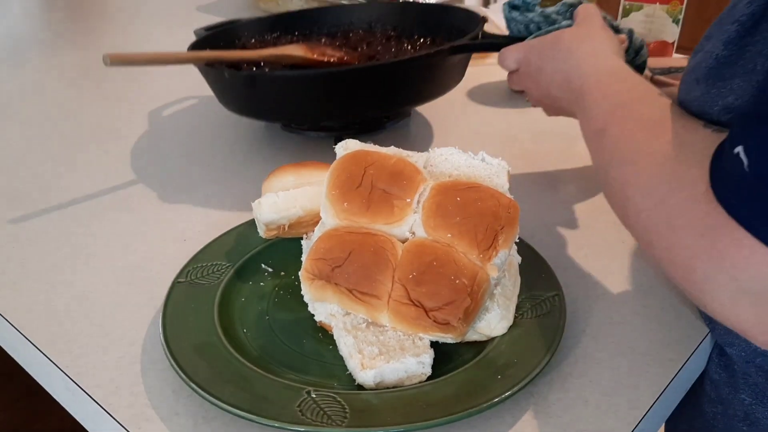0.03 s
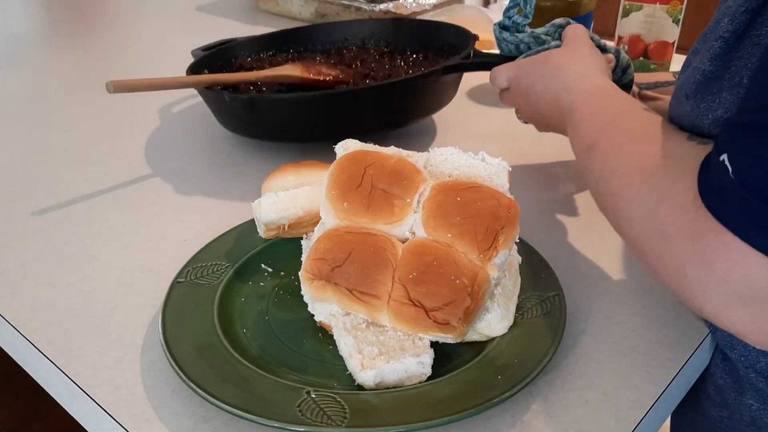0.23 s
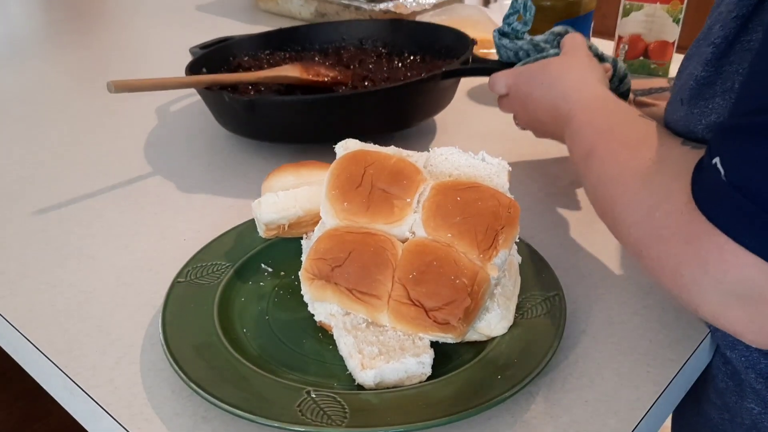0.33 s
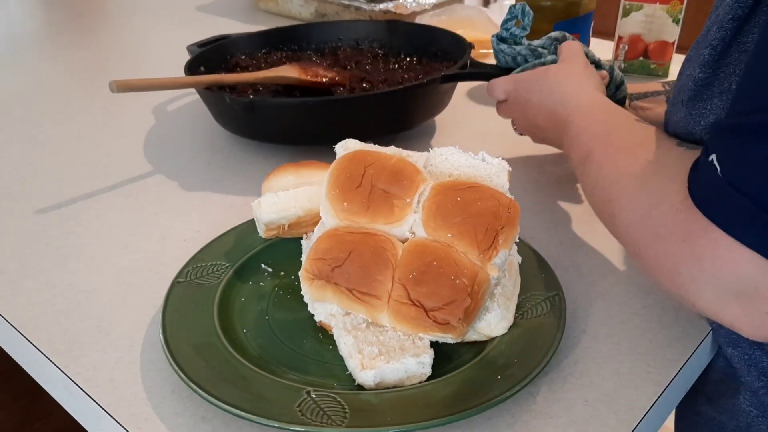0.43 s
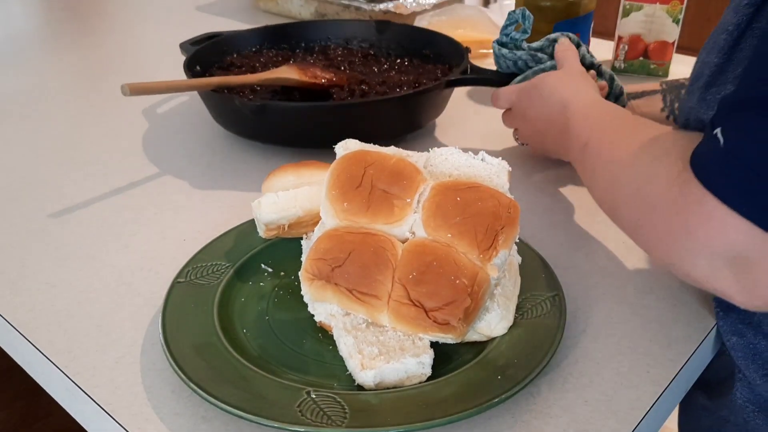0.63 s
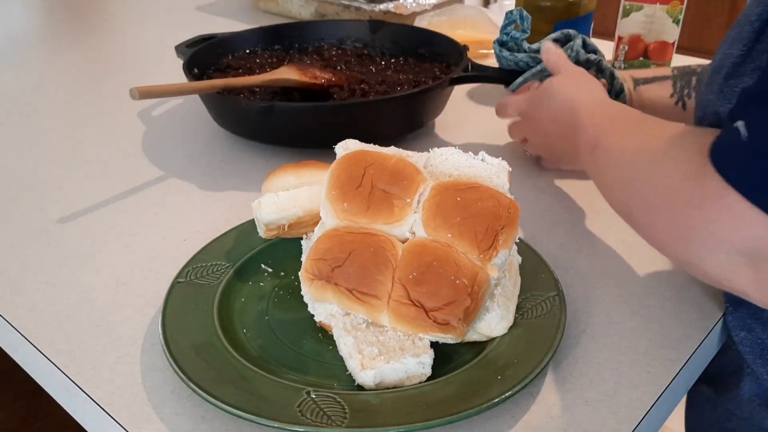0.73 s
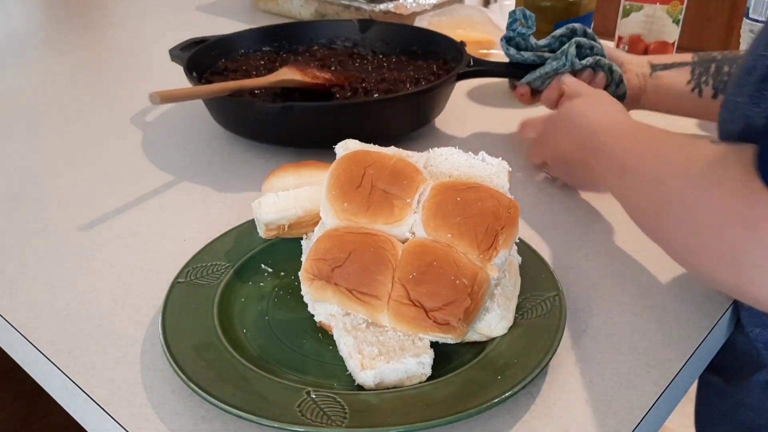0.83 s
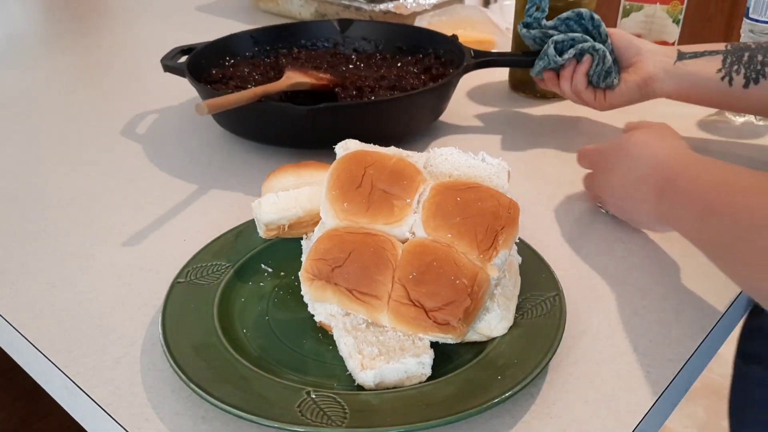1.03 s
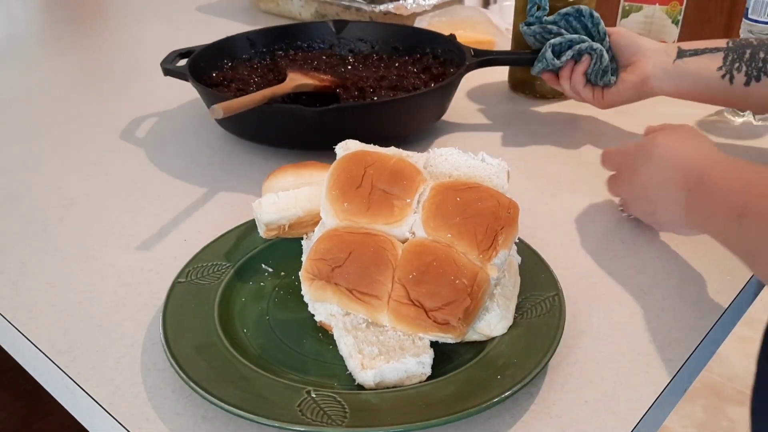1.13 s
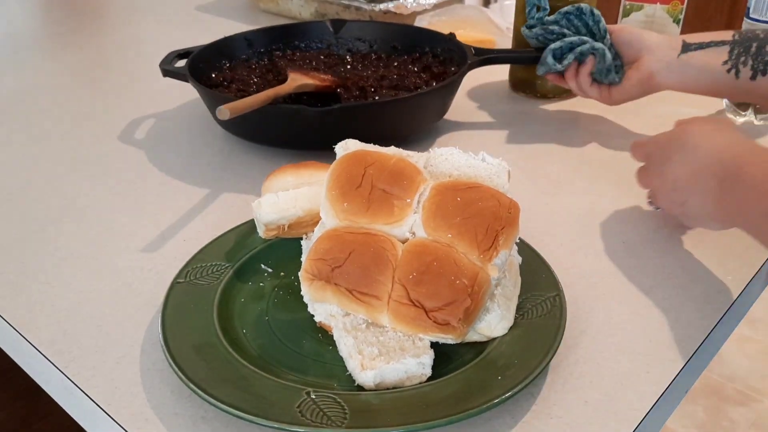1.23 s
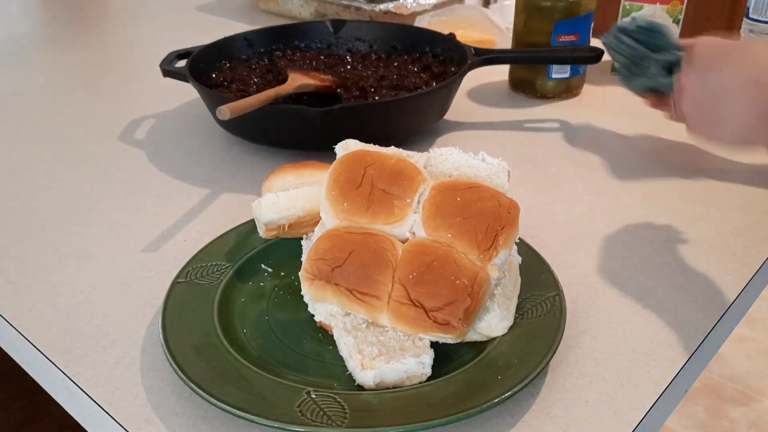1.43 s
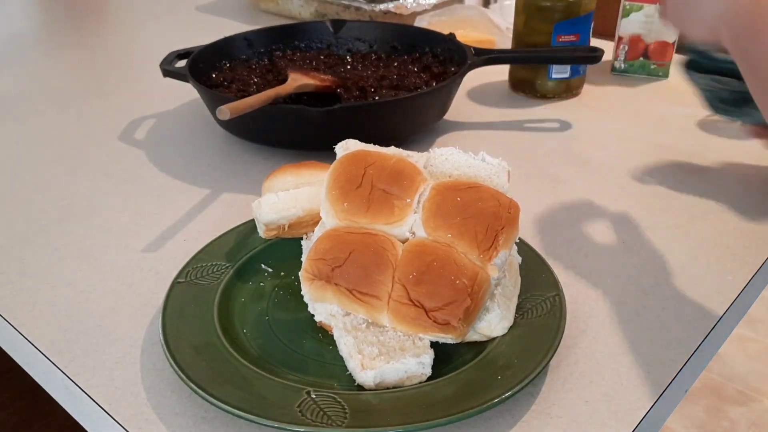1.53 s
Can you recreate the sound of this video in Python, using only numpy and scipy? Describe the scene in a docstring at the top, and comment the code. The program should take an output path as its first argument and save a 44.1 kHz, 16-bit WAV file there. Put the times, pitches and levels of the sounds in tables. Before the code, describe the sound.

Heavy iron pan set down on a worktop with a double clunk, clatter and short gritty shuffle

```python
"""In a small, quiet kitchen, a heavy, full cast-iron skillet lands on the counter: one edge first,
then it rocks and clunks flat. Each contact is a burst of noise plus fading tones for worktop and iron.
Light knocks follow, the pan is shuffled round on its base and the pot cloth slips off the handle.
Grating, rasping and rustling are made of thousands of tiny random clicks, shaped in tone and level.
Fading noise adds the echo of the room; steady noise and a low tone make its air and hum."""
import sys
import numpy as np
from scipy import signal
from scipy.fft import rfft, irfft, next_fast_len
from scipy.io import wavfile

SR = 44100
rng = np.random.default_rng(int(sys.argv[2]) if len(sys.argv) > 2 else 0)


def persist_wave(psi):
    """Save psi, clipped to +-1, as 16-bit WAV."""
    counts = np.round(np.clip(psi, -1, 1) * 32767).astype(np.int16)
    wavfile.write(sys.argv[1], SR, np.atleast_2d(counts).T)


N = 70560  # length in samples: 1.6 seconds

# A "t60" is the time in which a sound fades by 60 dB.

# Still air of the room. Each row: frequency in Hz, relative level in dB.
AIR_COLOUR = [(15, -64.5), (25, -38), (48, 3), (108, -16), (166, -9.5), (206, -27.5), (249, -9.5),
              (489, -7), (560, -22.5), (754, -12.5), (818, -30), (2350, -24.5), (4610, -38), (6740, -37.5),
              (16000, -36.5)]
AIR_DB, HUM_HZ, HUM_DB = -69, 59, -81

# Cloth rubbing on the handle. Each row: time in seconds, level in dB.
CLOTH_LEVEL = [(0, -82), (.7, -70), (.88, -68.5), (1.02, -62), (1.1, -76), (1.21, -75.5), (1.28, -68.5),
               (1.40, -69.5), (1.44, -65.5), (1.49, -74), (1.6, -71.5)]
# Tone of the cloth. Each row: frequency in Hz, relative level in dB.
CLOTH_COLOUR = [(200, -12), (900, -13), (1800, 3), (3500, -2), (5200, 3.5), (6700, 8), (9200, -8),
                (11000, -5), (16000, -7)]

# Contacts of the pan. Each row: start in seconds, noise level in dB, frequency in Hz above which
# the noise gets weaker, worktop thump level in dB, iron ring level in dB.
CONTACTS = [(.221, -25, 2800, -25, -41.5), (0.239, -26, 900, -20.5, -35.5),
            (0.264, -15.5, 1100, -25.5, -30.5), (0.2704, -18, 1700, -16.5, -32),
            (.279, -34, 1000, -36, -24.5), (.290, -18, 1200, -27.5, -31), (.304, -23, 1400, -27.5, -33.5),
            (0.32, -24, 1700, -43, -29), (0.349, -31, 1200, -27, -34), (.386, -28.5, 1100, -31.5, -35),
            (0.49, -34, 6000, -40, -32.5), (0.4949, -13.5, 4300, -22.5, -31), (.502, -19, 1800, -54, -26),
            (.515, -25.5, 2500, -26, -28.5), (0.5504, -14.5, 5500, -33, -25.5),
            (.553, -15.5, 5500, -26, -40), (.577, -22.5, 4000, -57, -34.5),
            (0.601, -19.5, 1500, -35.5, -34), (.613, -15, 2200, -17, -31), (.621, -17, 450, -22.5, -39.5),
            (0.634, -22, 450, -31, -30), (.652, -24, 600, -35, -38), (.668, -53.5, 450, -25.5, -43.5)]
# The bare crack of a contact. Each row: frequency in Hz, relative level in dB.
CRACK_COLOUR = [(100, -18), (400, 12.5), (900, 8), (1500, 10.5), (3000, 3.5), (6000, -15), (8000, -4),
                (9300, -23.5), (11000, -7), (16000, -10)]
CRACK_DB, CRACK_T60_S = 0.5, 0.012
# Dense clatter of pan and counter. Each row: frequency in Hz, relative level in dB.
CLATTER_COLOUR = [(30, -21.5), (80, -8.5), (125, 3), (200, 5.5), (245, 2), (320, 10.5), (480, 12.5),
                  (620, 6), (900, 9), (1200, 0), (1500, 3.5), (2200, -1), (3700, -0.5), (5000, -6),
                  (7500, -12.5), (9200, -14.5), (11000, -1.5), (16000, -8.5)]
# How fast the clatter fades. Each row: frequency in Hz, t60 in seconds.
CLATTER_FADE = [(100, 0.36), (450, 0.16), (1500, 0.066), (4000, 0.041), (12000, 0.012)]
# Tones of the worktop. Each row: frequency in Hz, typical relative level in dB, t60 in seconds.
WORKTOP_TONES = [(122, -7, .08), (163, 1, .085), (208, -5, .1), (276, -10, .14), (302, -3, .11),
                 (422, -7, .12)]
# Tones of the iron. Each row: frequency in Hz, typical relative level in dB,
# t60 in seconds while on one edge, t60 in seconds once the base is down.
IRON_TONES = [(478, -6, 0.44, 0.3), (508.5, -3.5, 0.1, 0.071), (564.3, -14.5, 0.66, 0.13),
              (700.3, -0.5, 0.1, .12), (788.5, -4, 0.047, .16), (915, -5.5, 0.098, 0.17),
              (1043.3, -9, .08, 0.12), (1146, -13.5, .12, .1), (1332, -16.5, 0.12, 0.14),
              (1495, -7, 0.26, 0.051), (1589, -7, 0.28, 0.086), (1720, -21.5, 0.14, .1),
              (2002, -19, 0.12, 0.22), (2490, -28.5, .15, .2), (3344, -43, .08, .22),
              (3716, -31.5, .05, .22), (7900, -38.5, .08, .02)]
BASE_DOWN_S = 0.48
THUMP_ATTACK_S, RING_ATTACK_S = 0.0034, 0.00047
CONTACT_SLOPE = 2.01  # how steeply the noise weakens at high frequencies
SCATTER_DB = 4.5  # random spread of each tone's level
LOW_CUT_HZ = 93

# Iron grating on the counter. Each row: time in seconds, level in dB.
GRATE_LEVEL = [(.225, -64), (.265, -38), (.32, -46.5), (.42, -60.5), (.485, -56.5), (.505, -39), (.59, -35),
               (.65, -48), (.72, -51), (.78, -53.5), (.83, -46.5), (.9, -50.5), (1.02, -57), (1.1, -61.5),
               (1.22, -77), (1.35, -105)]
# Tone of the grating. Each row: frequency in Hz, relative level in dB.
GRATE_COLOUR = [(100, -15.5), (400, 5.5), (900, 4), (1600, -2.5), (2800, -11), (4000, -21), (6000, -13.5),
                (9000, -33.5), (12000, -24.5), (16000, -30)]
# The base juddering over the worktop. Each row: time in seconds, level in dB.
JUDDER_LEVEL = [(.68, -73), (.72, -63), (.78, -78), (.83, -61), (.89, -47.5), (.95, -40), (1.02, -41.5),
                (1.09, -53.5), (1.19, -55.5), (1.26, -76), (1.35, -85)]
# Tone of the juddering. Each row: frequency in Hz, relative level in dB.
JUDDER_COLOUR = [(25, -28), (55, -9), (100, -11), (135, -2.5), (172, 5), (228, -9.5), (290, 2.5),
                 (380, -12.5), (550, -12), (900, -22.5), (2000, -36), (6000, -67.5)]
GRATE_SLIPS_PER_S, JUDDER_SLIPS_PER_S = 2300, 1200

# The tilted edge rasping along the counter. Each row: time in seconds, level in dB.
RASP_LEVEL = [(.258, -50.5), (.272, -29.5), (.325, -28.5), (.36, -42), (.395, -42.5), (.47, -81.5)]
# Tones of the iron wall. Each row: centre in Hz, half-width in Hz, relative level in dB.
WALL_PEAKS = [(697, 160, 1.5), (940, 150, -0.5), (1430, 280, 1.5), (1680, 53, -12.5), (2400, 270, -9.5),
              (7000, 1500, -33)]
RASP_SLIPS_PER_S = 900

# Light knocks. Each row: start in seconds, noise level in dB, pitch in Hz, typical tone level in dB.
LIGHT_KNOCKS = [(.787, -31.5, 808, -43), (.812, -38, 527, -38.5), (.824, -47, 502, -35.5)]
# Tone of the knock noise. Each row: frequency in Hz, relative level in dB.
KNOCK_NOISE_COLOUR = [(100, -49), (500, -30), (800, 11), (1500, 8), (3000, -1.5), (6000, -11.5),
                      (9000, -22.5), (11000, -10.5), (16000, -20)]
KNOCK_T60_S, TONE_T60_S = 0.046, 0.13

# How alike left and right are. Each row: frequency in Hz, likeness from 0 (unrelated) to 1 (same).
LIKENESS = [(60, 0.72), (160, 1), (280, 0.85), (500, 0.85), (1000, 0.4), (2000, 0), (12000, 0)]
# Left-right balance of the pan. Each row: frequency in Hz, left minus right in dB.
PAN_BALANCE = [(100, 0.5), (250, 1.5), (500, 2.5), (1000, 1.5), (2000, 1.75), (4000, -0.5), (8000, -7.5),
               (12000, 6.2)]
# How fast the room echo fades. Each row: frequency in Hz, t60 in seconds.
ROOM_FADE = [(100, 0.45), (220, .2), (450, 0.34), (2000, 0.34), (6000, .44), (14000, 0.26)]
# Tone of the room echo. Each row: frequency in Hz, level in dB compared with the direct sound.
ECHO_COLOUR = [(140, -11), (400, -10.5), (1500, -7.5), (4000, -2.5), (12000, -7)]
ROOM_BUILD_S = 0.0024
TOP_HZ = 16100


def amp(db):
    """Turn decibels into a plain multiplier."""
    return 10 ** (np.asarray(db) / 20)


def unit(x):
    """Scale a sound to an average strength (rms) of 1."""
    return x / np.sqrt(np.mean(x ** 2) + 1e-20)


def along(points, hz):
    """Read a value between table rows, with frequency on a log scale."""
    point_hz, values = np.transpose(points)
    return np.interp(np.log(hz + 1), np.log(point_hz + 1), values)


def level(rows):
    """Turn rows of seconds and dB into a multiplier for every sample."""
    times, levels_db = np.transpose(rows)
    return amp(np.interp(np.arange(N) / SR, times, levels_db, left=-120))


def filtered(x, gain):
    """Change the strength of each frequency without letting any sound start early."""
    n = x.shape[-1]
    size = 2 * next_fast_len(n)
    log_gain = np.log(np.maximum(gain(np.fft.rfftfreq(size, 1 / SR)), 1e-6))
    # Folding this log spectrum's transform onto its first half gives a minimum-phase filter.
    cepstrum = irfft(log_gain, size)
    cepstrum[1:size // 2] *= 2
    cepstrum[size // 2 + 1:] = 0
    response = np.exp(rfft(cepstrum))
    return irfft(rfft(x, size) * response, size)[..., :n]


def coloured(x, points):
    """Shape the tone of a sound with rows of Hz and dB."""
    return filtered(x, lambda hz: amp(along(points, hz)))


def half_turn(hz):
    """Half the angle whose cosine is the left-right likeness."""
    return np.arccos(np.clip(along(LIKENESS, hz), -1, 1)) / 2


def spread(pair):
    """Mix two unrelated signals into stereo: alike in the bass, apart in the treble."""
    n = pair.shape[-1]
    turn = half_turn(np.fft.rfftfreq(n, 1 / SR))
    mid, side = irfft(rfft(pair) * [np.cos(turn), np.sin(turn)], n)
    return np.array([mid + side, mid - side])


def hiss(size):
    """Stereo white noise."""
    return spread(rng.standard_normal((size, 2)).T)


def dying(t60s, size=8192):
    """Stereo noise in which each frequency fades at its own speed."""
    hz, t, spectrum = signal.stft(hiss(size), SR, nperseg=128)
    fade = np.exp(-np.log(1000) * t / along(t60s, hz)[:, None])
    return signal.istft(spectrum * fade, SR, nperseg=128)[1][:, :size]


def add(track, s, sound):
    """Mix a sound into a track at time s, cutting what runs past the end."""
    part = track[:, round(s * SR):][:, :sound.shape[1]]
    part += sound[:, :part.shape[1]]


def ring(modes, attack_s):
    """A struck object gives fading tones; the higher ones are out of step between left and right."""
    t = np.arange(SR // 2) / SR
    out = np.zeros((2, len(t)))
    for hz, db, t60 in modes:
        skew = rng.choice([-1, 1]) * half_turn(hz)
        life = t[:int(t60 * SR)]
        fade = amp(db + SCATTER_DB * rng.normal()) * np.exp(-np.log(1000) * life / t60)
        tone = np.sin(2 * np.pi * hz * life + np.array([[skew], [-skew]]))
        add(out, 0, fade * tone)
    return out * (1 - np.exp(-t / attack_s))


def friction(per_s, colour, uneven_db):
    """Rubbing is many tiny slips of uneven size at random moments; its rms is 1."""
    happens = rng.random((2, N)) < per_s / SR
    sizes = amp(uneven_db * rng.standard_normal((2, N)))
    signs = rng.choice([-1, 1], (2, N))
    return unit(coloured(spread(happens * sizes * signs), colour))


def background():
    """Still room air is coloured noise; a low appliance hum is one pure tone."""
    air = amp(AIR_DB) * unit(coloured(hiss(N), AIR_COLOUR))
    hum = amp(HUM_DB) * np.sin(2 * np.pi * HUM_HZ * np.arange(N) / SR)
    return air + hum


def cloth():
    """The pot cloth rustles with many tiny slips as the grip shifts and lets go."""
    return level(CLOTH_LEVEL) * friction(5000, CLOTH_COLOUR, uneven_db=-2)


def set_down():
    """Every contact cracks, clatters, thumps the worktop and rings the iron."""
    out = np.zeros((2, N))
    for s, db, corner_hz, thump_db, ring_db in CONTACTS:
        def contact(hz):
            """Strength of this contact's noise, weaker above its corner frequency."""
            return amp(db) / np.sqrt(1 + (hz / corner_hz) ** (2 * CONTACT_SLOPE))

        crack = dying([(1000, CRACK_T60_S)], size=1024)
        crack = filtered(crack, lambda hz: contact(hz) * amp(CRACK_DB + along(CRACK_COLOUR, hz)))
        clatter = dying(CLATTER_FADE)
        clatter = filtered(clatter, lambda hz: contact(hz) * amp(along(CLATTER_COLOUR, hz)))
        thump = amp(thump_db) * ring(WORKTOP_TONES, THUMP_ATTACK_S)
        # The iron tones fade at different speeds once the base is down.
        iron = [(hz, tone_db, on_edge if s < BASE_DOWN_S else flat)
                for hz, tone_db, on_edge, flat in IRON_TONES]
        iron_ring = amp(ring_db) * ring(iron, RING_ATTACK_S)
        for sound in (crack, clatter, thump + iron_ring):
            add(out, s, sound)
    low_cut = signal.butter(2, LOW_CUT_HZ, "highpass", fs=SR, output="sos")
    return signal.sosfilt(low_cut, out)


def shuffle():
    """The rough base grates and judders over the counter in tiny slips."""
    grate = level(GRATE_LEVEL) * friction(GRATE_SLIPS_PER_S, GRATE_COLOUR, uneven_db=1.5)
    judder = level(JUDDER_LEVEL) * friction(JUDDER_SLIPS_PER_S, JUDDER_COLOUR, uneven_db=2.5)
    return grate + judder


def rasp():
    """While the pan is tilted, its edge sticks and slips and makes the iron wall sound."""
    def wall(hz):
        """Strength at each frequency: the wall's peaks added as power."""
        power = sum(amp(db) ** 2 / (1 + ((hz - peak_hz) / width) ** 2) ** 2
                    for peak_hz, width, db in WALL_PEAKS)
        return np.sqrt(power)

    slips = friction(RASP_SLIPS_PER_S, [(1000, 0)], uneven_db=3)  # even in tone
    return level(RASP_LEVEL) * unit(filtered(slips, wall))


def knocks():
    """Light, dry knocks, probably a wooden spoon on the rim: short noise plus one fading tone."""
    out = np.zeros((2, N))
    for s, db, hz, tone_db in LIGHT_KNOCKS:
        noise = coloured(dying([(1000, KNOCK_T60_S)]), KNOCK_NOISE_COLOUR)
        add(out, s, amp(db) * noise)
        add(out, s, ring([(hz, tone_db, TONE_T60_S)], RING_ATTACK_S))
    return out


def kitchen(x):
    """Walls and cupboards answer with a short, blurred echo, made from fading noise."""
    tail = dying(ROOM_FADE, size=SR // 2)
    t = np.arange(tail.shape[1]) / SR
    tail = tail * (1 - np.exp(-t / ROOM_BUILD_S)) ** 2
    tail = coloured(tail / np.linalg.norm(tail[0]), ECHO_COLOUR)
    return signal.fftconvolve(x, tail, axes=1)[:, :N]


def scene():
    """The pan and its echo lean left through the bass and middle; cloth and background are added."""
    pan = set_down() + shuffle() + rasp() + knocks()
    left, right = pan + kitchen(pan)
    # Each side takes half of the difference in level.
    left = filtered(left, lambda hz: amp(along(PAN_BALANCE, hz) / 2))
    right = filtered(right, lambda hz: amp(-along(PAN_BALANCE, hz) / 2))
    return np.array([left, right]) + cloth() + background()


def record(dry):
    """A steep filter removes nearly everything above the band limit."""
    band_limit = signal.ellip(12, 0.1, 90, TOP_HZ, fs=SR, output="sos")
    return signal.sosfilt(band_limit, dry)


dry = scene()
out = record(dry)
persist_wave(out)
```